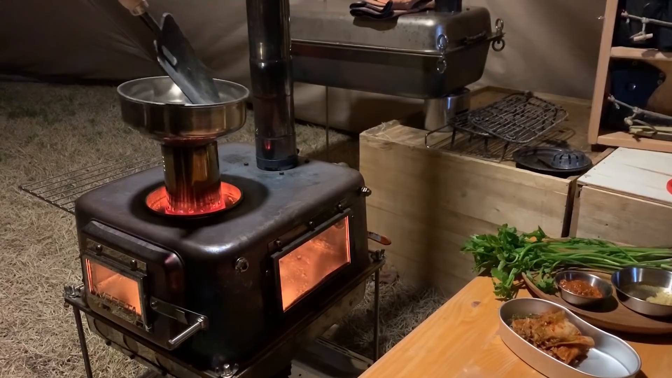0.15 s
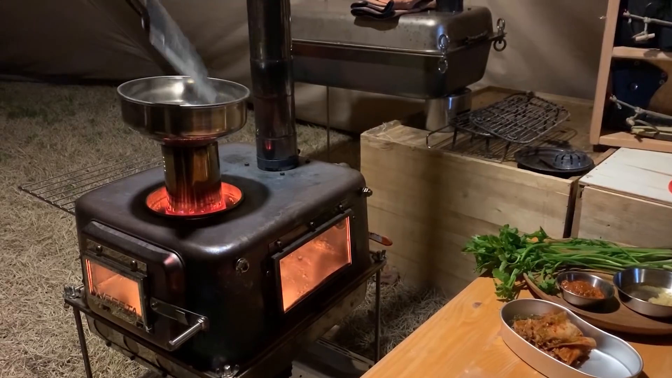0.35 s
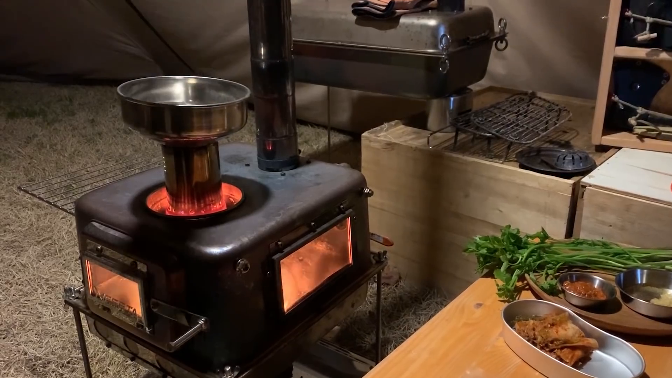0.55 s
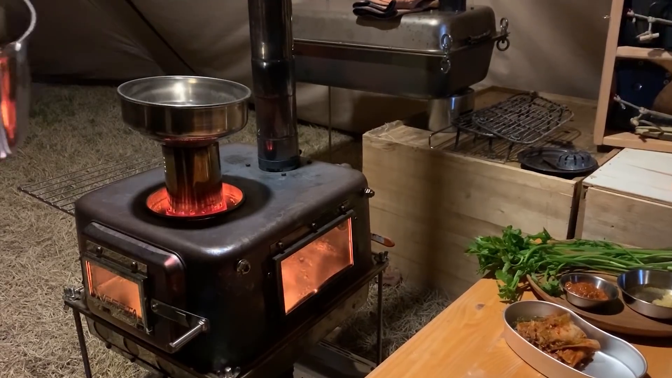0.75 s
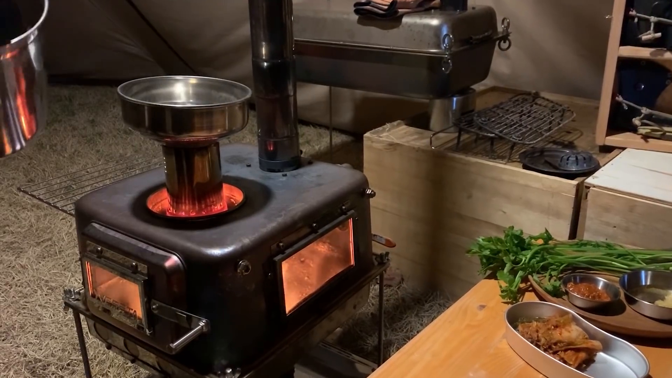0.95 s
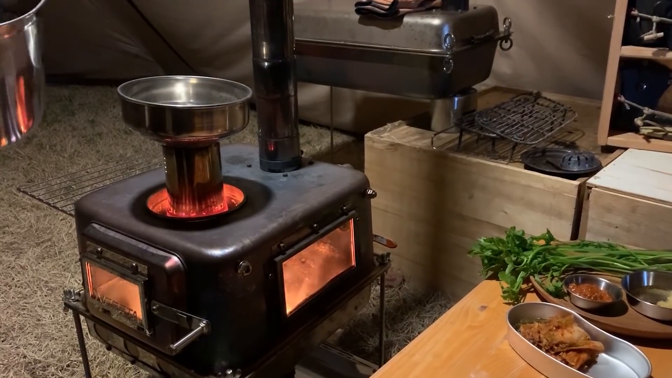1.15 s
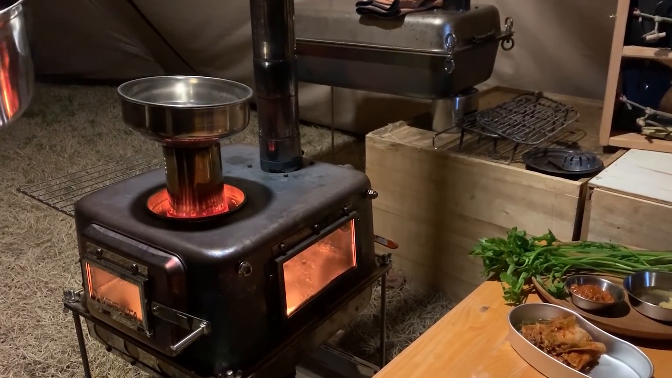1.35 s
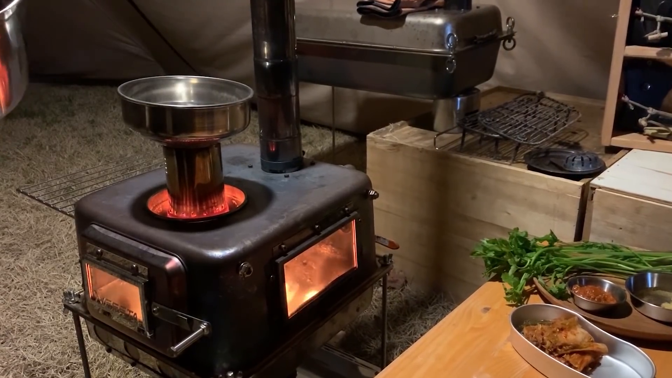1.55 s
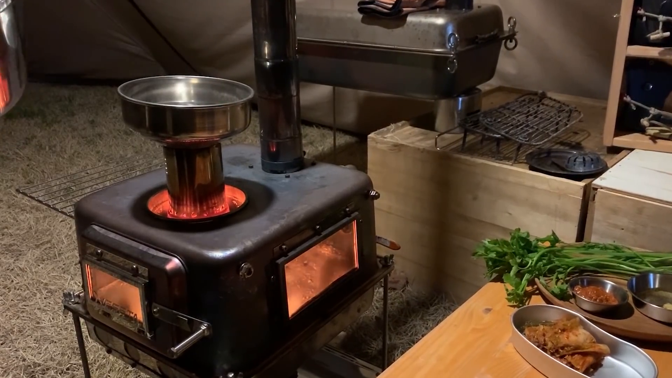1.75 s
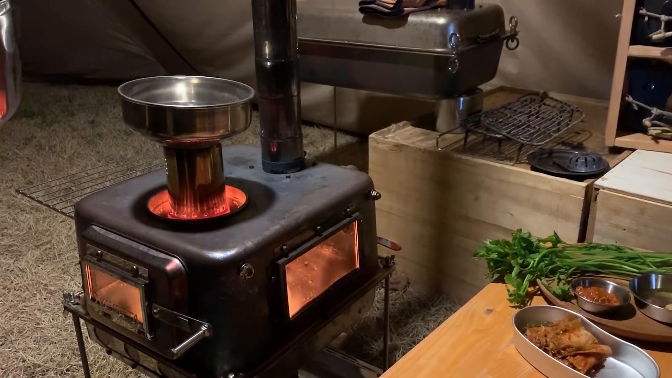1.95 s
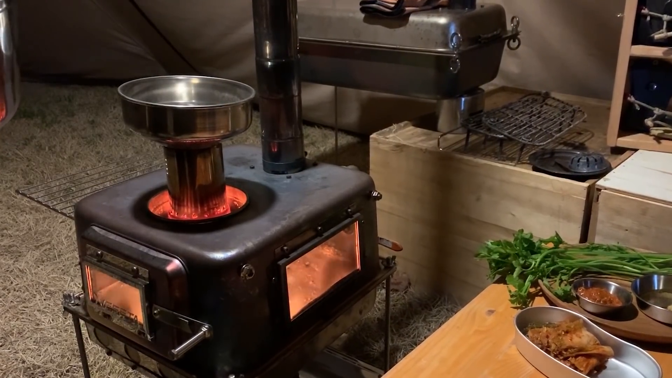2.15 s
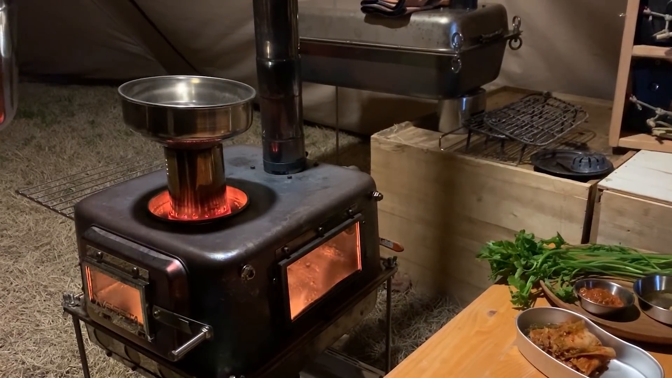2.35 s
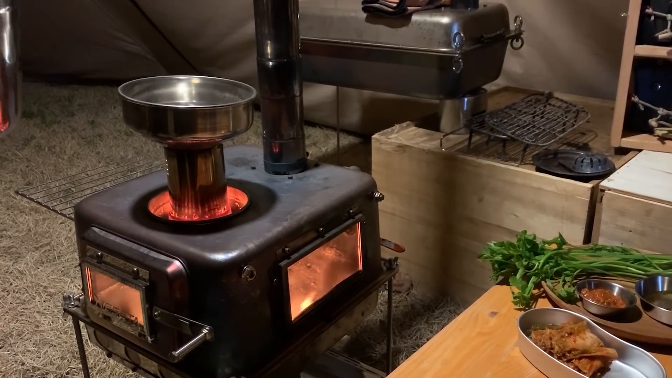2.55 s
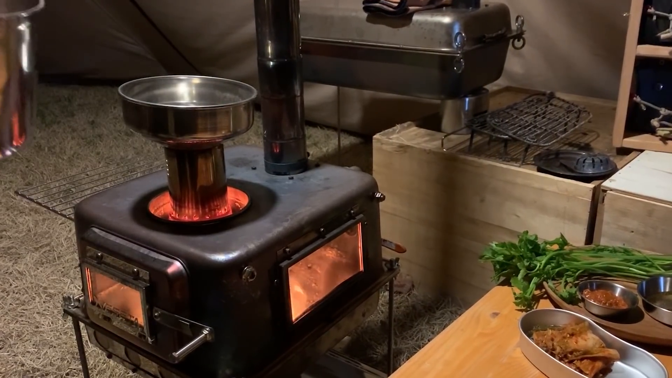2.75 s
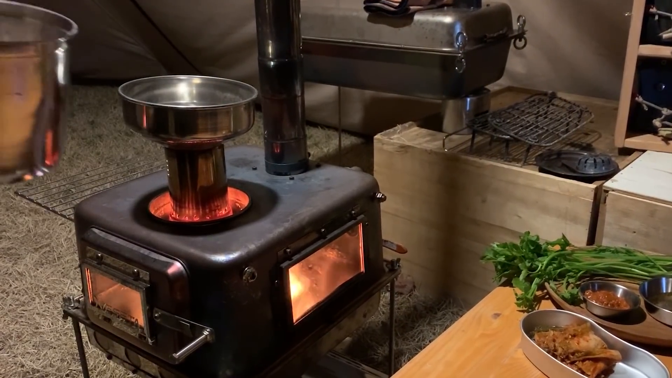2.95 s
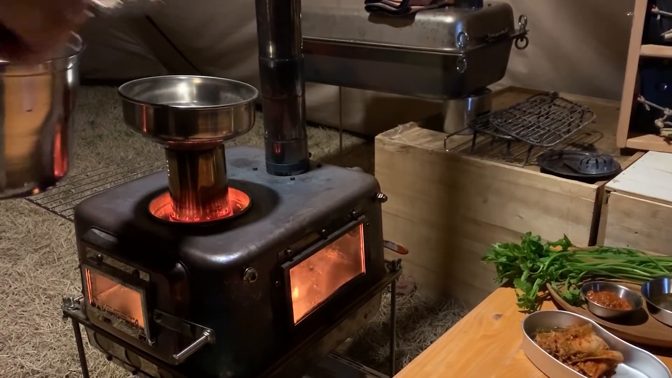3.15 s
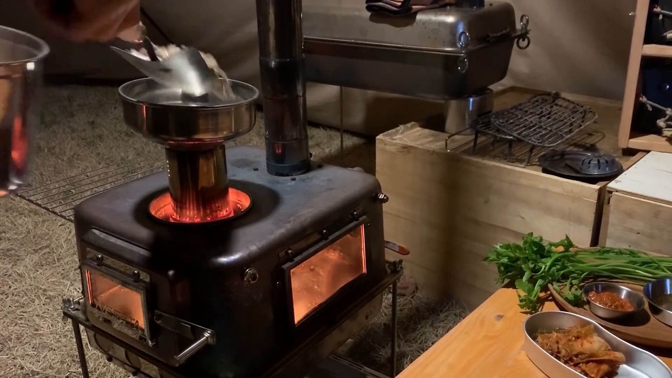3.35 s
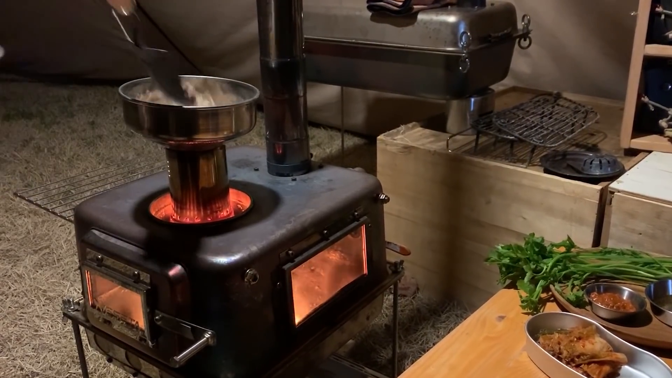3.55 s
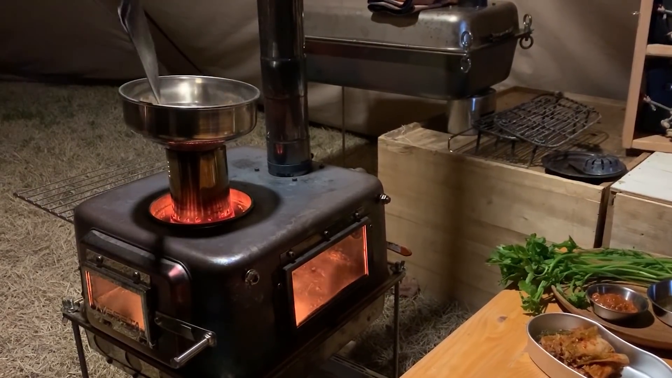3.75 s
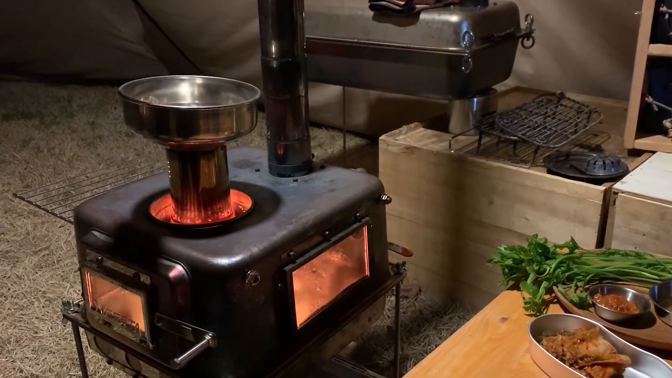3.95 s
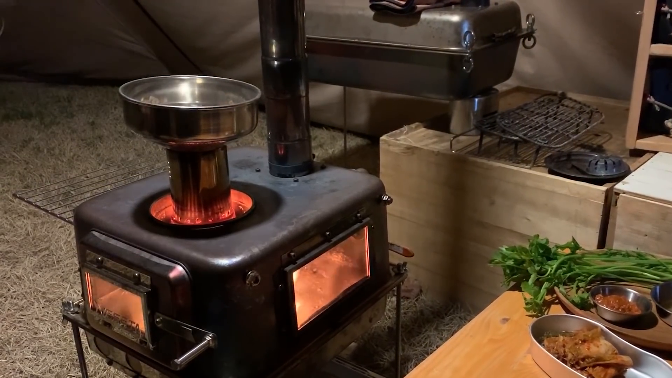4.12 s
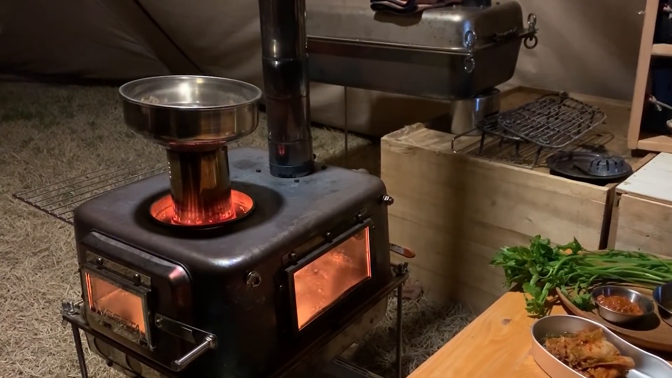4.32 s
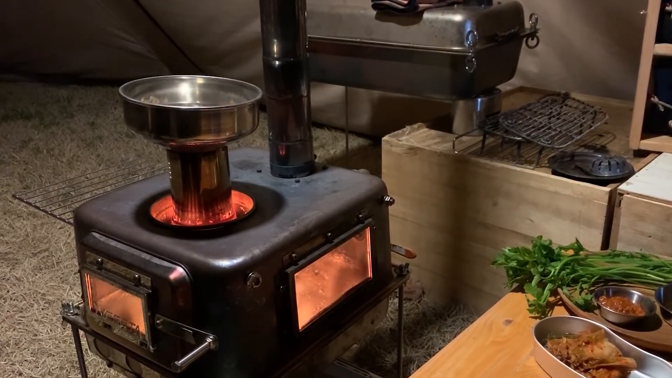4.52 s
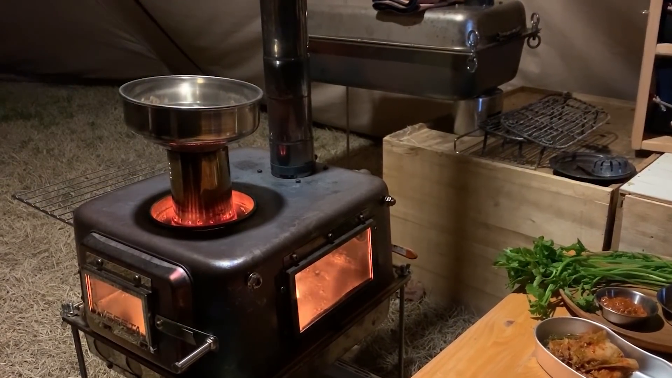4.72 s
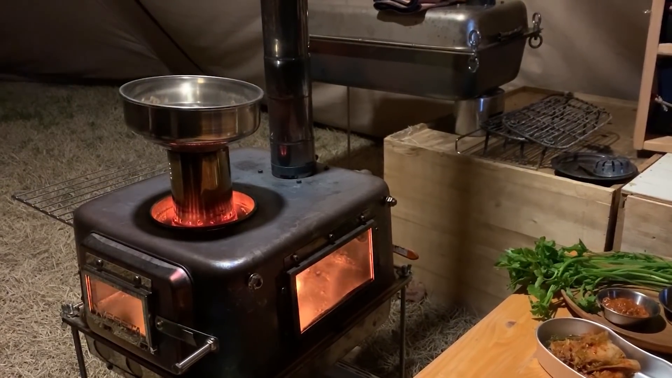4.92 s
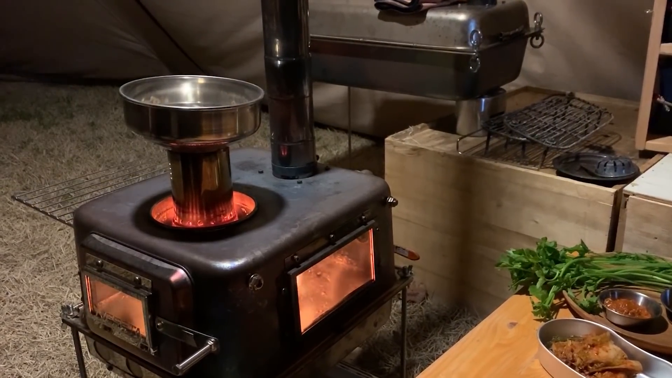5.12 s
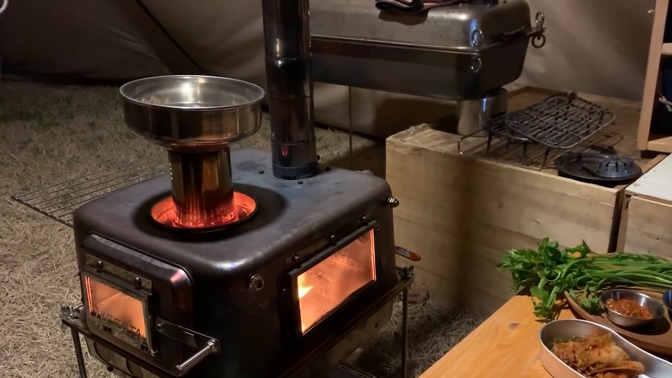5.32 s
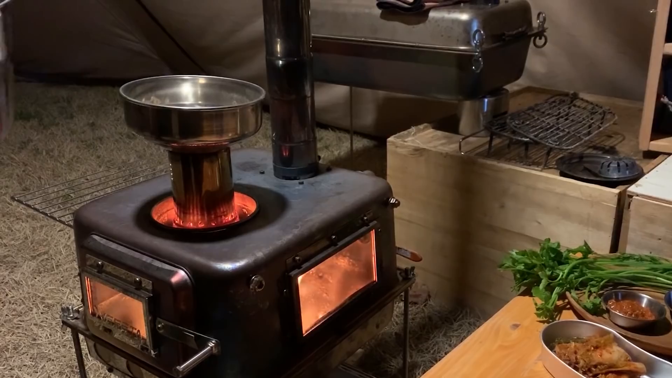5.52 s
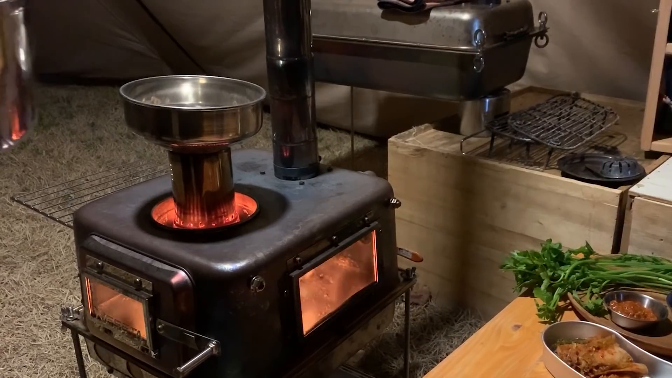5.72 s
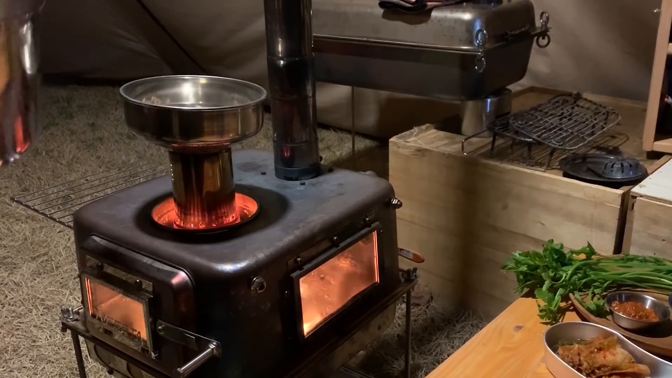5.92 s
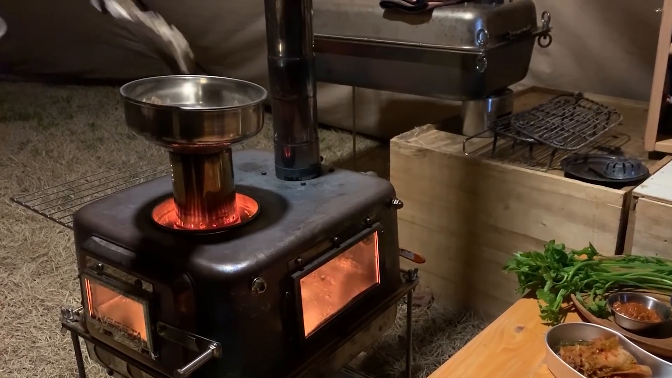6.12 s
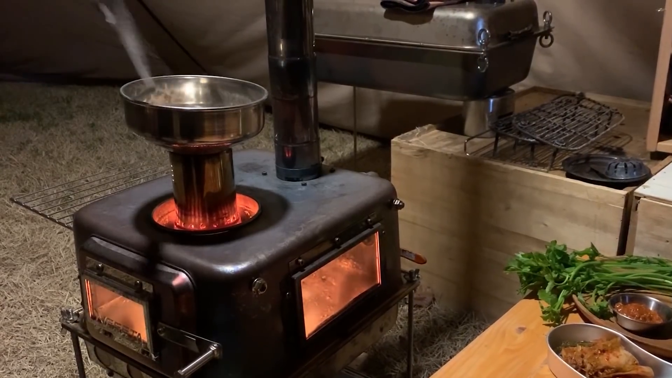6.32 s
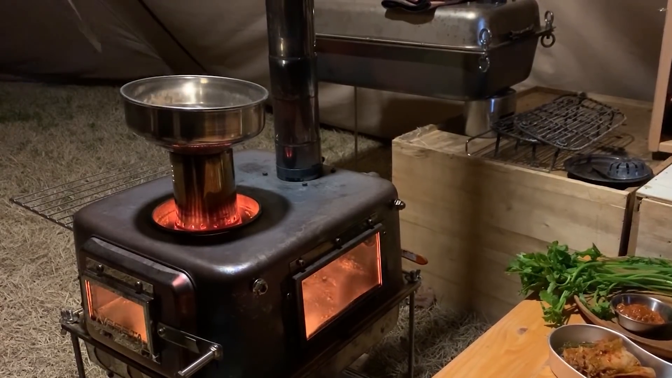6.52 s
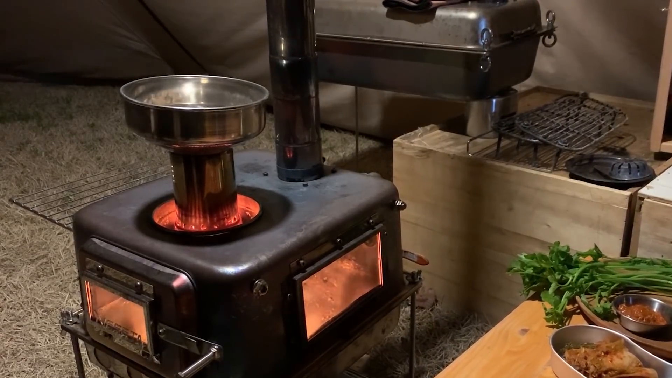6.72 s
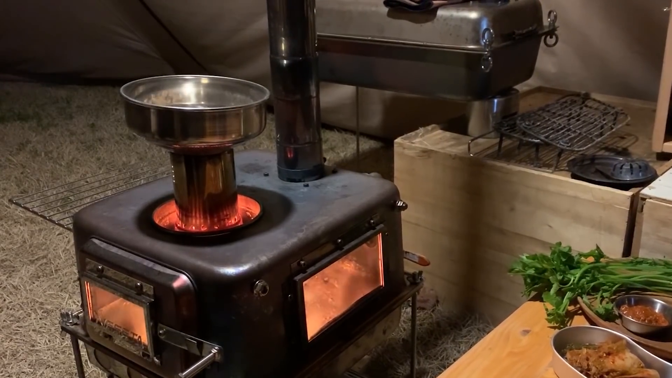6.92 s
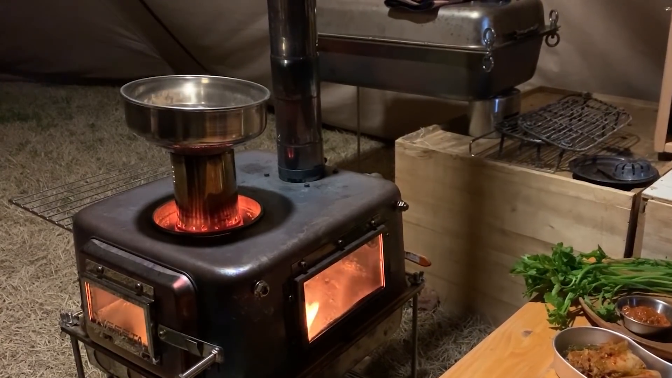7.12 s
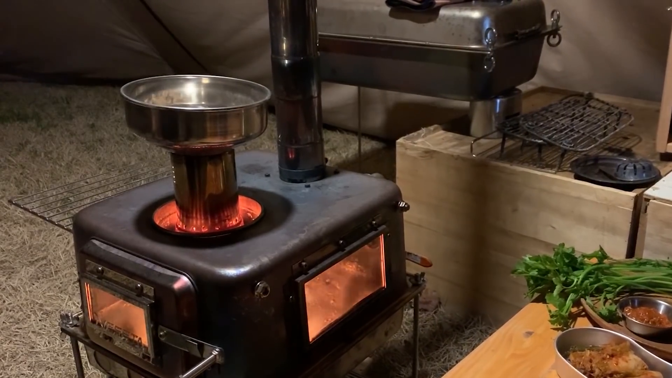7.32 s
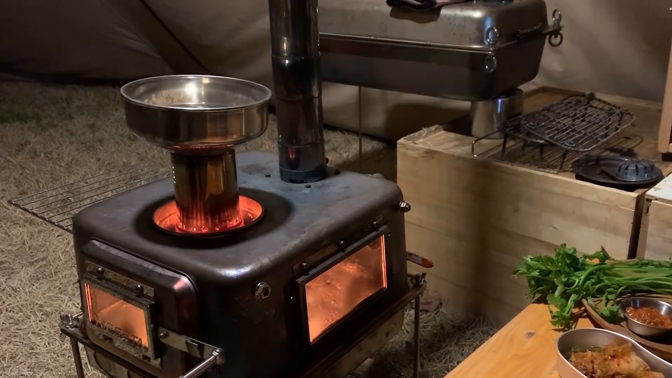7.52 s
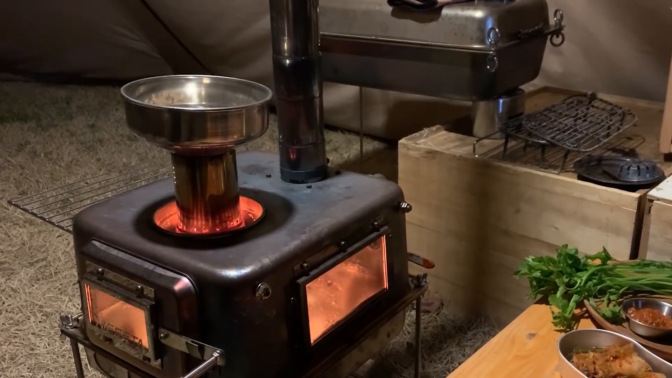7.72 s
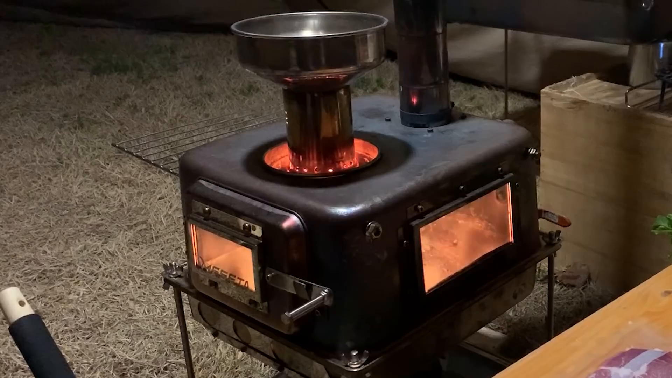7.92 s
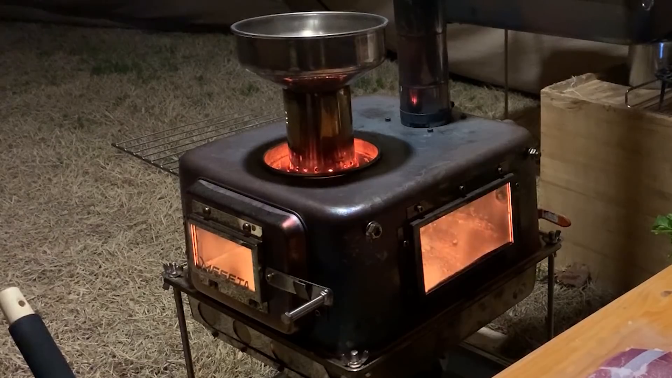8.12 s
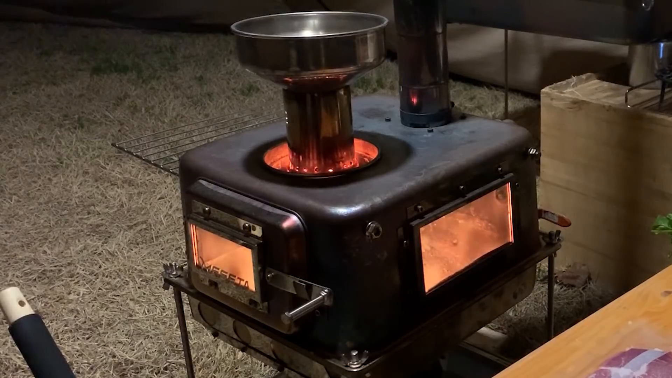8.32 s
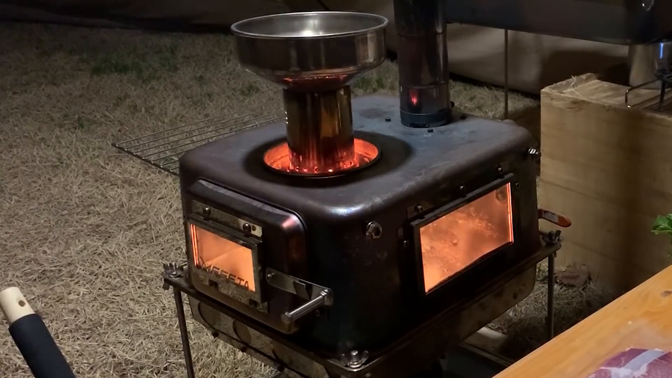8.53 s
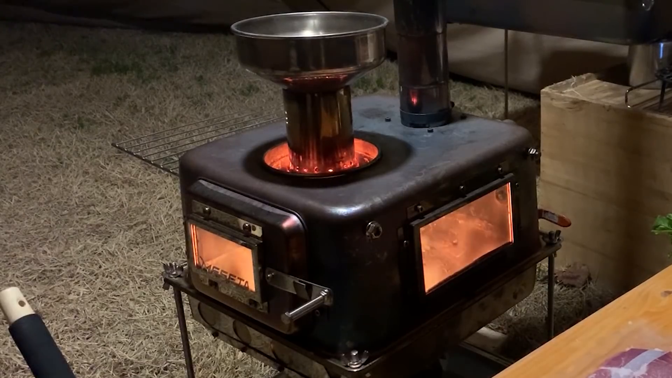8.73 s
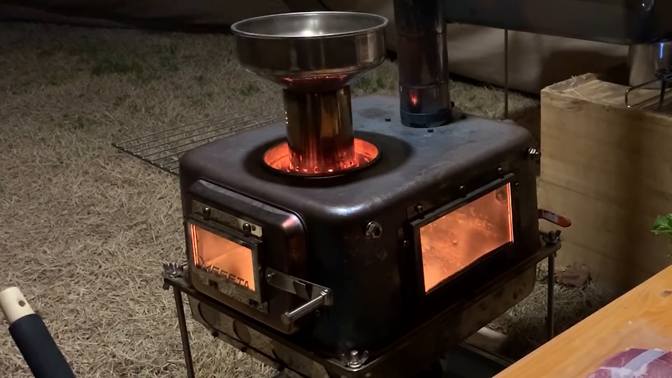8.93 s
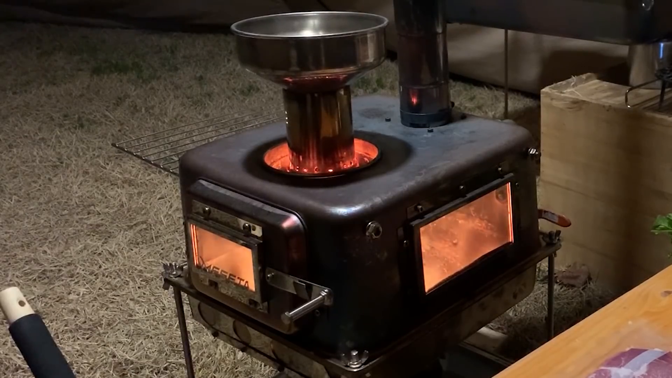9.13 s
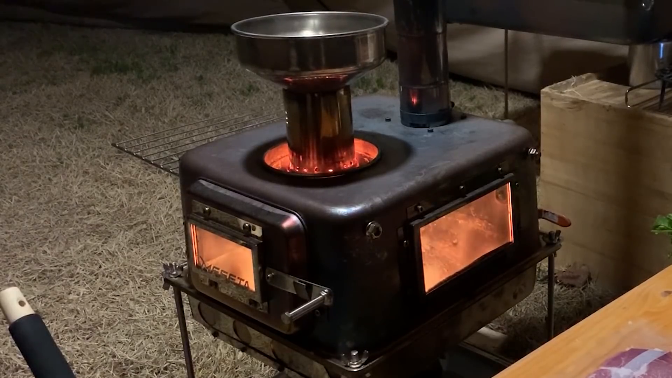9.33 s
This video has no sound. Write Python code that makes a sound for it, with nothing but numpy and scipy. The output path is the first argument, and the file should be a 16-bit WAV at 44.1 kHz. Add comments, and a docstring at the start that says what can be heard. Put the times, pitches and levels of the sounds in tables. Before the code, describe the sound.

In a small tent with a short, dry stereo scatter, a pellet stove rumbles very faintly. At 0 s a scoop judders on the steel hopper rim, a short wavering groan near 425 Hz, with a dull tumble down the feed tube. At 0.9 s the blade bites into wood pellets, rattling and crunching until a soft stop near 1.17 s. Quick shakes tick from 1.7 to 2.4 s, then a light knock. Around 3.4-3.8 s pellets crash brightly into the funnel, leaving a metallic ring. A hard scoop clank rings at 4.12 s; a sharp dig follows at 4.5 s, with scattered ticks until 6.1 s. At 6.23 s a shorter, dense pour strikes the ringing steel. Fine rustling and ticks come near 7.2 s, a knock at 7.8 s. At 7.96 s a loud, deep close fire roar begins abruptly and continues steadily to the end, with slight whistle and hiss.

```python
"""Feeding a pellet stove in a tent

A metal scoop digs into wood pellets, spills a few as it is lifted and tips the rest into a steel hopper.
Random contacts drive the resonances of blade, funnel and feed tube; the struck steel is decaying sines.
Shaped noise gives the rustle of sliding pellets and the fire's rumble, suddenly a loud close roar near the end.
"""
import sys
import numpy as np
from scipy import signal
from scipy.fft import rfft, irfft, next_fast_len
from scipy.io import wavfile
from scipy.ndimage import uniform_filter1d, map_coordinates

SR = 44100
rng = np.random.default_rng(int(sys.argv[2]) if len(sys.argv) > 2 else 0)


def wrap_up_sound(samples):
    """Save the sound to the file named by the first command line argument, as 16-bit audio."""
    columns = np.atleast_2d(samples).T
    # keep every value between -1 and 1, then stretch to whole-number steps
    tamed = np.clip(columns, -1, 1)
    steps = np.round(tamed * 32767).astype(np.int16)
    wavfile.write(sys.argv[1], SR, steps)


N = 413216
T = np.arange(N) / SR
SIZE = next_fast_len(N + SR)
HZ = np.maximum(np.arange(SIZE // 2 + 1) * SR / SIZE, 1)
EARS = np.array([[.5], [-.5]])  # left and right take half of each difference
LN_60_DB = np.log(1000)
ROAR_START_S = 7.961
CUTOFF_HZ = 15700
BEND_SHARE, BEND_STEP_S = .014, .03


def from_db(db):
    """Decibels to gain."""
    return 10 ** (np.asarray(db) / 20)


def rms_one(x):
    """Scale to unit power."""
    return x / np.sqrt(np.mean(np.abs(x) ** 2) + 1e-20)


def at_hz(points):
    """Read a table along log frequency."""
    hz, value = np.transpose(points)
    return np.interp(np.log(HZ), np.log(hz), value)


def filtered(x, response):
    """Apply a frequency response."""
    return irfft(rfft(x, SIZE) * response, SIZE)[..., :N]


def colour(points):
    """Minimum-phase response with a given spectrum, at unit power."""
    cepstrum = irfft(at_hz(points) * np.log(10) / 20, SIZE)
    cepstrum[1:SIZE // 2] *= 2
    cepstrum[SIZE // 2 + 1:] = 0
    return rms_one(np.exp(rfft(cepstrum)))


def ringing(modes):
    """Unit-power response of decaying sines with alternating signs."""
    t = T[:SR]
    rings = np.zeros(len(t))
    for k, (hz, db, t60_s) in enumerate(modes):
        decay = np.exp(-LN_60_DB * t / t60_s)
        rings += (-1) ** k * from_db(db) * decay * np.sin(2 * np.pi * hz * t)
    return rms_one(rfft(rings, SIZE))


def resonances(peaks):
    """Ringing of damped peaks: the wider the peak, the shorter the ring."""
    return ringing([(hz, db + 20 * np.log10(width_hz), LN_60_DB / (np.pi * width_hz))
                    for hz, width_hz, db in peaks])


def grains(per_s, spread_db, clump_db):
    """Random collisions of uneven strength in little avalanches, at unit power."""
    sizes = from_db(spread_db * np.minimum(rng.exponential(1, N), 4)) * rng.choice([-1, 1], N)
    knots = np.arange(0, T[-1] + 1, .012)
    surge = from_db(clump_db * np.interp(T, knots, rng.standard_normal(len(knots))))
    return rms_one(sizes * surge * (rng.random(N) < per_s / SR))


def bursts(events):
    """Each blow (s, dB, s) is a noisy chatter of contacts that dies by 60 dB in its length, 4 ms or more."""
    out = np.zeros(N + SR)
    t = T[:SR // 2]
    for start_s, db, length_s in events:
        start = max(round(start_s * SR), 0)
        decay = np.exp(-LN_60_DB * t / max(length_s, .004))
        out[start:start + len(t)] += from_db(db) * rng.standard_normal(len(t)) * decay
    return out[:N]


def strikes(events):
    """One clean impulse for each blow (s, dB)."""
    return sum(from_db(db) * (np.arange(N) == round(start_s * SR)) for start_s, db in events)


def chimes(notes, t60_s):
    """Decaying sines, each given as (s, dB, Hz)."""
    out = np.zeros(N + SR)
    t = T[:SR // 6]
    decay = np.exp(-LN_60_DB * t / t60_s)
    for start_s, db, hz in notes:
        start = round(start_s * SR)
        out[start:start + len(t)] += from_db(db) * decay * np.sin(2 * np.pi * hz * t)
    return out[:N]


def clinks(contacts, width_hz, count=40):
    """Each contact rings for a few milliseconds at one of `count` pitches; power is kept."""
    dealt = rng.integers(0, count, N)
    r = np.exp(-np.pi * width_hz / SR)
    out = np.zeros(N)
    for k, hz in enumerate(np.linspace(900, 15000, count)):
        poles = [1, -2 * r * np.cos(2 * np.pi * hz / SR), r * r]
        out += signal.lfilter([1, 0, -1], poles, contacts * (dealt == k) + 1e-18)
    return out * np.sqrt((1 - r * r) / 2)


def bent(x, share):
    """Read a sound at a slowly wandering speed, so that its pitches drift."""
    knots = np.arange(0, T[-1] + 1, BEND_STEP_S)
    wander = uniform_filter1d(np.interp(T, knots, rng.standard_normal(len(knots))), size=400)
    lag_s = wander * share * BEND_STEP_S / np.sqrt(2)
    return map_coordinates(x, [(T + lag_s) * SR], order=3)


def envelope(start_s, hold_s, release_db_per_s, slope_db_per_s=0):
    """Gain that sets in at once, holds or slopes, then dies away."""
    t = T - start_s
    db = slope_db_per_s * np.clip(t, 0, hold_s) - release_db_per_s * np.maximum(t - hold_s, 0)
    return (t >= 0) * from_db(db)


SWELL_DB = 16  # drop one rise before and one fall after the top


def swell_db(t, top_s, rise_s, fall_s):
    """A rounded rise and fall in dB, 0 at its top."""
    return -SWELL_DB * np.minimum(((t - top_s) / np.where(t < top_s, rise_s, fall_s)) ** 2, 20)


# Level excess on the left: pitch_hz, level_db
LEFT_EXCESS = [(200, -1), (500, 2), (1100, 6.5), (2200, 1), (4000, -2.5), (12000, 0.5)]


def tent(x, lead, wet_db, t60_s):
    """Direct sound leads in the left ear; a short scatter off stove, boxes and canvas is wide above the bass."""
    t = T[:SR // 2]
    scatter = rng.standard_normal((2, len(t))) * np.exp(-LN_60_DB * t / t60_s) * (t > .002)
    diffuse = rms_one(rfft(scatter, SIZE)) * HZ / np.hypot(HZ, 300)
    direct = np.exp(1j * at_hz(lead) * EARS) * from_db(at_hz(LEFT_EXCESS) * EARS)
    return filtered(x, direct + from_db(wet_db) * diffuse)


# Side over mid of diffuse sound: pitch_hz, level_db
SIDE_OVER_MID = [(60, -20), (110, -19), (200, -9.5), (400, -2), (800, 2.5), (15000, -2)]


def wash(gain, response):
    """Stereo noise that fills the tent: alike in the bass, unrelated in the treble."""
    side_response = response * from_db(at_hz(SIDE_OVER_MID))
    mid, side = filtered(gain * rng.standard_normal((2, N)), [response, side_response])
    return np.array([mid + side, mid - side])


# Spectra of far rumble, close flame and close hiss: pitch_hz, level_db
RUMBLE_SPECTRUM = [(25, -23.5), (45, -13), (66, -2.5), (110, -8.5), (200, -16), (300, -23.5), (550, -26),
                   (950, -33.5), (1500, -41), (4000, -47), (8000, -57), (15500, -66.5)]
FLAME_SPECTRUM = [(16, -55), (28, -9.5), (48, -4), (70, 2), (128, -8), (259, -20), (303, -21.5), (488, -22),
                  (593, -25.5), (625, -22), (890, -32), (1380, -48.5), (1900, -71), (2470, -101),
                  (4180, -120)]
HISS_SPECTRUM = [(940, -21.5), (1600, 2.5), (2480, -1), (7180, -6.5), (9280, 1), (10600, -2), (11500, -27),
                 (13200, 0.5), (15500, -18)]
FIRE_DB, ROAR_DB, FLAME_HISS_DB = -56, -34.5, -65.5
FIRE_LEAD_S, FIRE_LEAN_DB = .00035, -0.1  # earlier and slightly weaker on the left


def fire():
    """Flame noise booms in firebox and flue; from close by it roars, whistles and hisses."""
    close = T > ROAR_START_S
    draught = from_db(FIRE_DB) * (T < ROAR_START_S - .02)  # the level dips just before the roar
    flame = from_db(ROAR_DB) * close
    far = wash(from_db(1.3) * draught, colour(RUMBLE_SPECTRUM))
    roar = wash(from_db(1.0) * flame, colour(FLAME_SPECTRUM))
    boom = wash(from_db(-4) * (flame + draught), resonances([(61.5, 10, 0)]))
    whistle = wash(from_db(-19.0) * flame, resonances([(584.8, 5.9, 0)]))
    hiss = wash(from_db(FLAME_HISS_DB) * close, colour(HISS_SPECTRUM))
    placed = np.exp(2j * np.pi * HZ * FIRE_LEAD_S * EARS) * from_db(FIRE_LEAN_DB * EARS)
    return filtered(far + roar + boom + whistle, placed) + hiss


# Scoop judders on the hopper rim: start_s, level_db, hold_s
RIM_JUDDERS = [(0.0, -28, 0.0071), (.047, -41, 0.058), (0.162, -37.5, 0.071)]
# Feed tube resonances: pitch_hz, width_hz, level_db
TUBE_RESONANCES = [(426, 78, 4), (393, 23, -4), (1490, 900, -27), (2560, 170, -16), (3030, 120, -12.5),
                   (4020, 4800, -26.5), (4750, 110, -24.5)]
JUDDER_HZ, JUDDER_TONE_DB, JUDDER_SCRAPE_DB, JUDDER_STOP_DB_PER_S = 425, -4, -7, 214


def judder():
    """The scoop sticks and slips on the rim: a wavering groan of the feed tube with some scrape."""
    rub = sum(from_db(db) * envelope(start_s, hold_s, JUDDER_STOP_DB_PER_S)
              for start_s, db, hold_s in RIM_JUDDERS)
    groan = bent(np.sin(2 * np.pi * JUDDER_HZ * T), share=.035)
    scrape = filtered(rub * rng.standard_normal(N), resonances(TUBE_RESONANCES))
    return from_db(JUDDER_TONE_DB) * rub * groan + from_db(JUDDER_SCRAPE_DB) * scrape


# Scoopfuls into the hopper: start_s, full_flow_s, steel_rattle_db, tube_tumble_db
SCOOPFULS = [(0.12, 0.0045, -51.5, -37), (3.45, 0.16, -22, -49), (6.226, 0.014, -16.5, -46.5)]
LEAD_IN_DB, LEAD_IN_DB_PER_S = -17.5, 281.5
DRAIN_DB_PER_S, TUBE_DRAIN_DB_PER_S = 173.5, 58.5


def pouring():
    """Flow onto steel and down the tube: a few pellets run ahead on the steel, the heap follows, then drains."""
    flow = tube = 0
    for start_s, hold_s, rattle_db, tube_db in SCOOPFULS:
        lead_in = (T < start_s) * from_db(LEAD_IN_DB - LEAD_IN_DB_PER_S * np.abs(start_s - T))
        flow = flow + from_db(rattle_db) * (lead_in + envelope(start_s, hold_s, DRAIN_DB_PER_S))
        tube = tube + from_db(tube_db) * envelope(start_s, hold_s, TUBE_DRAIN_DB_PER_S)
    return flow, tube


# Spectrum of pellets on the funnel: pitch_hz, level_db
FUNNEL_SPECTRUM = [(470, -48), (800, -22.5), (1010, -13), (1350, -21), (2160, -22.5), (2300, -13.5),
                   (3050, -5), (3370, 0.5), (4650, -21.5), (5140, -2.5), (7010, -11), (8650, -2.5),
                   (11500, -15), (12900, -11), (15500, -18)]
PINGS_PER_S, PING_DB, PING_SPREAD_DB, PING_T60_S = 260, -7.5, -1.5, 0.12


def pings(flow, count=3):
    """Single hits in the pour; their partials favour pitches where the funnel is most resonant."""
    born = (rng.random(N) < PINGS_PER_S / SR) & (flow > from_db(-60))
    share = np.cumsum(from_db(at_hz(FUNNEL_SPECTRUM)) ** 2 * (HZ < CUTOFF_HZ))
    sizes_db = PING_DB + PING_SPREAD_DB * np.clip(rng.standard_normal(N), -2, 2)
    pitches = np.interp(rng.random((N, count))[born], share / share[-1], HZ)
    hits = zip(T[born], 20 * np.log10(flow[born]) + sizes_db[born], pitches)
    return chimes([(start_s, db, hz) for start_s, db, partials in hits for hz in partials], PING_T60_S)


# Clumps of pellets landing: start_s, level_db, length_s
LANDING_CLUMPS = [(.129, -38, .15), (3.421, -11, .05), (3.429, -11.5, 0.12), (3.4567, -9, 0.13),
                  (3.577, -16, .14), (3.656, -18, .08), (3.673, -13, 0.075), (3.70, -30, 0.27),
                  (3.784, -25.5, 0.08), (6.204, -31, 0.31), (6.233, -9, 0.16), (6.409, -28, 0.075),
                  (6.477, -38.5, 0.058)]
# Heaviest clumps, rim sings: start_s, level_db
RIM_BLOWS = [(3.457, -2), (6.234, 0)]
# Funnel resonances: pitch_hz, width_hz, level_db
FUNNEL_RESONANCES = [(996, 78, -18), (2350, 29, -7), (2780, 39, -8), (3260, 44, -1), (3460, 45, 0),
                     (3690, 28, -5), (5160, 100, 0), (5290, 61, -4), (5460, 29, -4), (5770, 62, -6),
                     (6120, 45, -2), (6250, 15, -4), (6650, 110, -7), (6970, 35, -14), (7620, 47, -4),
                     (8340, 83, -2), (8660, 140, -3), (9000, 98, -1), (9260, 96, -3), (10300, 69, -10)]
# Long steel rings: pitch_hz, level_db, t60_s; the close rim pair beats and so swells in
RIM_RINGS = [(930, -13, 1.3), (1643, 0, 1.1), (1644, 0, 1.1), (2356, 9, .22)]
FUNNEL_RINGS = [(2356, -2, .2), (2779, -3, .18), (3218, 0, .2), (3445, 1, .16), (3470, -6, .25),
                (4975, -3, .2), (5489, -4, .2), (5160, -1, .22), (5276, -3, .2), (6115, -3, .25),
                (7618, -7, .26), (8348, -4, .22), (9769, -8, .22)]
# Spectrum of the feed tube: pitch_hz, level_db
TUBE_SPECTRUM = [(76, -39.5), (130, -6), (327, -1), (364, -6), (430, 2), (674, -20), (834, -15.5),
                 (2200, -25.5), (2860, -59.5), (4840, -120)]
FUNNEL_RING_DB = -9


def hopper():
    """Pellets rain on the steel funnel, ring it and tumble down the feed tube."""
    flow, tube = pouring()

    def contacts():
        """An independent draw of contacts for each kind of vibration."""
        return flow * grains(per_s=1700, spread_db=5.0, clump_db=2.0) + from_db(-4.0) * bursts(LANDING_CLUMPS)

    on_wall, on_cone, on_rim = [contacts() for _ in range(3)]
    crack = from_db(-5.0) * filtered(clinks(on_wall, width_hz=630), colour(FUNNEL_SPECTRUM))
    body = from_db(-3.5) * bent(filtered(on_cone, resonances(FUNNEL_RESONANCES)), BEND_SHARE)
    ring = from_db(FUNNEL_RING_DB) * filtered(on_rim, ringing(FUNNEL_RINGS))
    rim_song = filtered(strikes(RIM_BLOWS), ringing(RIM_RINGS))
    tumble = tube * grains(per_s=1100, spread_db=2.4, clump_db=2.5)
    tube_sound = from_db(1.5) * filtered(tumble, colour(TUBE_SPECTRUM))
    return crack + body + ring + rim_song + pings(flow) + judder() + tube_sound


# Spectral change of the loaded funnel: pitch_hz, change_db
LOAD_CHANGE = [(700, -2), (1600, -6), (2250, 7.5), (2800, -1.5), (3500, -4.5), (4600, 0.5), (9000, -3.5),
               (14000, -4)]
LOADED_S = 5


def loaded(x):
    """The steel changes colour once it holds pellets."""
    full = T > LOADED_S
    return x * ~full + filtered(x * full, from_db(at_hz(LOAD_CHANGE)))


# Scoop driven into the store: start_s, length_s, bite_db, rattle_db, stop_crunch_db
SCOOP_DIGS = [(.904, 0.2687, -41, -38, -31.5), (4.529, 0.26, -26, -39, -28.5)]
# Full scoop lifted and shaken level: top_s, rise_s, fall_s, rattle_db, crunch_db
SCOOP_LIFTS = [(1.39, 0.22, 0.11, -52, -42.5), (2.0, 0.62, .36, -50.5, -53), (5.17, .42, 0.34, -46.5, -51)]
MUFFLE_DB_PER_S, PACK_DB_PER_S, STOP_DB_PER_S, CRUNCH_STOP_DB_PER_S = 26, 79, 223, 550


def digging():
    """Rattle fades and crunch builds as the blade sinks in; both swell again as it is lifted."""
    push = packing = 0
    for start_s, length_s, _, rattle_db, crunch_db in SCOOP_DIGS:
        push = push + from_db(rattle_db) * envelope(start_s, length_s, STOP_DB_PER_S, -MUFFLE_DB_PER_S)
        crunch_start = from_db(crunch_db - PACK_DB_PER_S * length_s)
        packing = packing + crunch_start * envelope(start_s, length_s, CRUNCH_STOP_DB_PER_S, PACK_DB_PER_S)
    for top_s, rise_s, fall_s, rattle_db, crunch_db in SCOOP_LIFTS:
        motion = from_db(swell_db(T, top_s, rise_s, fall_s))
        push = push + from_db(rattle_db) * motion
        packing = packing + from_db(crunch_db) * motion
    return push, packing


HOPS_PER_S, HOP_DB, HOP_SPREAD_DB = 55, 19.5, 3


def hops(push):
    """Loose pellets hop on the moving blade: chance ticks (s, dB) that follow its rattle level."""
    born = (rng.random(N) < HOPS_PER_S / SR) & (push > from_db(-80))
    spread_db = HOP_SPREAD_DB * np.clip(rng.standard_normal(N), -2, 2)
    return list(zip(T[born], 20 * np.log10(push[born]) + HOP_DB + spread_db[born]))


TINK_DB, TINK_T60_S, TINK_LOW_HZ, TINK_HIGH_HZ = -25.5, 0.11, 2352, 9130


def tinks(ticks, count=6):
    """Each tick lands on another spot and wakes random blade partials, weaker the higher."""
    pitches = TINK_LOW_HZ * (TINK_HIGH_HZ / TINK_LOW_HZ) ** rng.random((len(ticks), count))
    notes = [(start_s, db + TINK_DB - 10 * np.log10(hz / TINK_LOW_HZ), hz)
             for (start_s, db, _), partials in zip(ticks, pitches) for hz in partials]
    return chimes(notes, TINK_T60_S)


# Free scoop knocked: start_s, thud_db, ring_db, partial_step_db, partial_1_hz to partial_4_hz
SCOOP_KNOCKS = [(2.471, -27, -35.5, -2.5, 460, 544, 1260, 2283),
                (4.912, -25, -28, -4.5, 1235, 466, 2020, 2412),
                (7.799, -23, -26.5, -2, 477, 890, 1990, 3042)]  # also played by knocks()
# Pellets tick on the scoop: start_s, level_db
PELLET_TICKS = [(0.099, -30.5), (0.13, -21.5), (0.189, -31), (0.9041, -16), (.9253, -23), (.96, -21),
                (0.9783, -17), (4.5282, -3.5), (4.6046, -17), (5.0041, -24), (5.0694, -25), (4.96, -36),
                (5.1094, -19.5), (5.12, -27), (5.144, -25.5), (5.195, -25), (5.363, -27), (5.2778, -19),
                (5.3134, -18.5), (5.4258, -21), (5.5075, -23.5), (5.603, -36.5), (5.706, -48), (5.798, -34),
                (5.914, -29.5), (5.9745, -33.5), (6.026, -40), (6.0997, -33.5), (6.1415, -27.5),
                (7.014, -18.5), (7.1321, -20.5), (7.2432, -23), (8.0061, -29.5)]
# Quick shakes throw the load against the blade: start_s, level_db
SCOOP_SHAKES = [(1.7391, -25.5), (1.7687, -24), (1.8029, -22.5), (1.877, -25.5), (1.9184, -20),
                (1.954, -20.5), (1.9967, -15.5), (2.0319, -20.5), (2.07, -21.5), (2.1075, -21),
                (2.1511, -19), (2.199, -20.5), (2.213, -24.5), (2.2591, -27), (2.3141, -30), (2.3483, -31),
                (2.4043, -33.5)]
# Blade resonances: pitch_hz, width_hz, level_db
BLADE_RESONANCES = [(470, 45, -4), (2560, 98, -2), (3010, 34, -7), (3650, 220, 0), (4310, 170, -9),
                    (5100, 42, -7), (5700, 39, -7), (6010, 55, -12), (6840, 130, -12), (8410, 370, -9),
                    (8860, 37, -10), (9490, 140, -10), (10500, 82, -13)]
# Faint blade rings under every tick: pitch_hz, level_db, t60_s
BLADE_MODES = [(2562, -6, .12), (3660, 0, .15), (3790, -4, .16), (5100, -6, .1)]
# Spectra of blade and heap: pitch_hz, level_db
BLADE_SPECTRUM = [(470, -43), (800, -25.5), (1810, -6), (2570, -5), (3210, -6), (3720, 2), (7270, -6.5),
                  (9680, -5.5), (11800, -20.5), (13500, -13), (15500, -20)]
CRUNCH_SPECTRUM = [(94, -57.5), (160, -14), (300, -9.5), (400, -4.5), (490, 1), (667, -10), (959, -9.5),
                   (1910, -19.5), (2400, -20.5), (3120, -42.5), (5280, -120)]
CLICK_S, SHAKE_S, HOP_S, BITE_S = .05, 0.032, 0.016, 0.57
JOLT_DB, BLADE_RING_DB = -5, -25


def scoop():
    """Pellets slide and tick on the blade while the heap crunches under it."""
    push, packing = digging()
    contacts = [(start_s, db, CLICK_S) for start_s, db in PELLET_TICKS]
    contacts += [(start_s, db, SHAKE_S) for start_s, db in SCOOP_SHAKES]
    contacts += [(start_s, db + JOLT_DB, CLICK_S) for start_s, db, *_ in SCOOP_KNOCKS]  # knocks jolt the load
    contacts += [(start_s, db, HOP_S) for start_s, db in hops(push)]
    ticks = contacts + [(start_s, bite_db, BITE_S) for start_s, _, bite_db, _, _ in SCOOP_DIGS]

    on_heap = from_db(-3.0) * push * grains(per_s=3900, spread_db=3.5, clump_db=5.0)
    on_heap += from_db(-16.5) * bursts(ticks)
    on_blade = from_db(-7.5) * push * grains(per_s=850, spread_db=5.0, clump_db=3.5)
    on_blade += from_db(-17.0) * bursts(ticks)

    rattle = filtered(clinks(on_heap, width_hz=330), colour(BLADE_SPECTRUM))
    body = filtered(on_blade, resonances(BLADE_RESONANCES))
    ring = from_db(BLADE_RING_DB) * bent(filtered(bursts(contacts), ringing(BLADE_MODES)), BEND_SHARE)
    packed = packing * grains(per_s=570, spread_db=1.0, clump_db=1.0)
    crunch = from_db(-1.5) * filtered(packed, colour(CRUNCH_SPECTRUM))
    return rattle + body + ring + tinks(contacts) + crunch


# Scoop thuds against the heap: start_s, level_db, boom_db
HEAP_THUDS = [(.128, -31, -47), (1.168, -29.5, -24), (4.123, -14.5, -19), (4.529, -18.5, -32),
              (4.793, -31, -24)]
# Scoop clanks down and bounces: start_s, level_db, length_s
SCOOP_CLANKS = [(4.1205, -7, 0.036), (4.1235, -0.5, .025), (4.139, -11, .06), (4.151, -15, .06),
                (4.161, -20.5, .04), (4.232, -42, .06)]
# Rings of the free scoop: pitch_hz, level_db, t60_s
SCOOP_RINGS = [(447, -1, .11), (1254, -13, .12), (1552, -12, .28), (2099, -15, .8), (2455, -11, .14),
               (2548, -7, .15), (2994, -11, .19), (3403, -7, .14), (3654, 5, .13), (3790, -16, .42),
               (4414, -10, .13), (4750, -1, .1), (4813, -13, .3), (5076, -6, .11), (5927, -17, .22),
               (6164, -11, .13), (7908, -8, .09), (8868, -5, .12), (9975, -10, .11)]
# Spectra of thuds and clanks: pitch_hz, level_db
THUD_SPECTRUM = [(130, -46), (220, -18.5), (475, 3.5), (628, -6.5), (1090, -7.5), (1410, -8), (1980, -10),
                 (2780, -15), (4500, -36), (5850, -41.5), (9900, -120)]
CLANK_SPECTRUM = [(94, -44.5), (160, -21.5), (476, -6.5), (647, -22), (1850, -17.5), (1960, -15.5),
                  (3230, -14.5), (3690, 4.5), (3980, -17.5), (4640, -3.5), (5840, -18.5), (7300, -25.5),
                  (8730, -13), (15500, -27)]
BOOM_HZ, BOOM_T60_S, KNOCK_T60_S = 490, .07, 0.044


def knocks():
    """The scoop thuds when buried in pellets and rings when it is free."""
    blows = [(start_s, db, .05) for start_s, db, *_ in list(HEAP_THUDS) + list(SCOOP_KNOCKS)]
    thuds = from_db(-8.0) * filtered(bursts(blows), colour(THUD_SPECTRUM))
    boom = chimes([(start_s, db, BOOM_HZ) for start_s, _, db in HEAP_THUDS], BOOM_T60_S)
    notes = [(start_s, db + k * step_db, hz)
             for start_s, _, db, step_db, *partials in SCOOP_KNOCKS for k, hz in enumerate(partials)]
    tones = chimes(notes, KNOCK_T60_S)
    clatter = from_db(-5.5) * filtered(bursts(SCOOP_CLANKS), colour(CLANK_SPECTRUM))
    first_clank = strikes([(SCOOP_CLANKS[0][0], 0)])
    ring = from_db(9.0) * filtered(first_clank, ringing(SCOOP_RINGS))
    return thuds + boom + tones + clatter + ring


# Loose pellets slide: top_s, rise_s, fall_s, level_db
PELLET_SLIDES = [(.58, .4, 0.34, -67), (3.1, 0.15, .5, -79), (7.221, 0.5, 0.5, -51),
                 (7.245, 0.045, 0.075, -52), (7.72, 0.21, 0.69, -54.5)]
# Spectrum of the rustle: pitch_hz, level_db
RUSTLE_SPECTRUM = [(160, -6.5), (280, 1.5), (1480, -9), (2320, -4), (9690, -17.5), (11500, -26.5),
                   (12900, -18), (15500, -27.5)]


def settling():
    """A fine, dense rustle of sliding pellets as swelling noise, until the fire takes over."""
    sliding = sum(from_db(db + swell_db(T, top_s, rise_s, fall_s))
                  for top_s, rise_s, fall_s, db in PELLET_SLIDES)
    return wash(sliding * (T < ROAR_START_S), colour(RUSTLE_SPECTRUM))


# Phase lead of the left ear: pitch_hz, lead_rad
HOPPER_LEFT_LEAD = [(0, 0), (600, 0.27), (1210, 8), (2930, 9.0), (3700, 17), (5000, 17), (6290, 18),
                    (7580, 15.5), (15600, 4.5), (16100, 2)]
SCOOP_LEFT_LEAD = [(60, .15), (400, 0.87), (1210, 2.1), (3530, 7.67), (4480, 7.96), (6200, 8.26),
                   (8350, 7.93), (15000, 5)]


def scene():
    """All sources in the tent."""
    poured = tent(loaded(hopper()), HOPPER_LEFT_LEAD, wet_db=-4.5, t60_s=0.033)
    dug = tent(scoop() + knocks(), SCOOP_LEFT_LEAD, wet_db=-3.0, t60_s=0.13)
    return poured + dug + fire() + settling()


def record(dry):
    """The microphone drops the deepest bass, rounds the peaks and cuts the top."""
    bass_cut = signal.butter(3, 36, "high", fs=SR, output="sos")
    top_cut = signal.ellip(10, .2, 80, CUTOFF_HZ, fs=SR, output="sos")
    heard = signal.sosfilt(bass_cut, dry)
    return signal.sosfilt(top_cut, np.tanh(heard))


dry = scene()
out = record(dry)
wrap_up_sound(out)
```